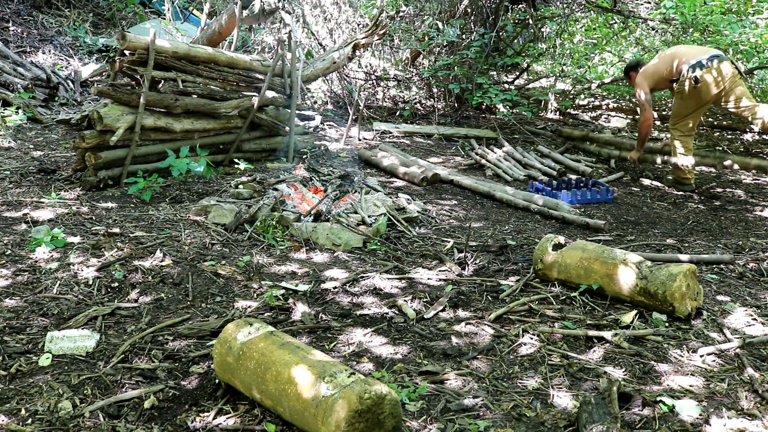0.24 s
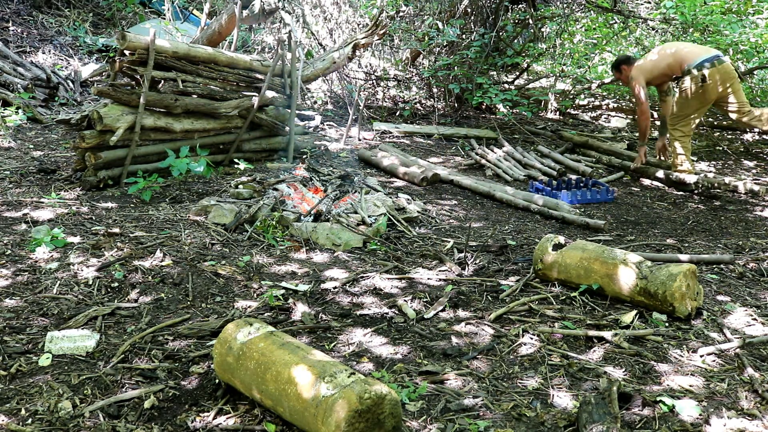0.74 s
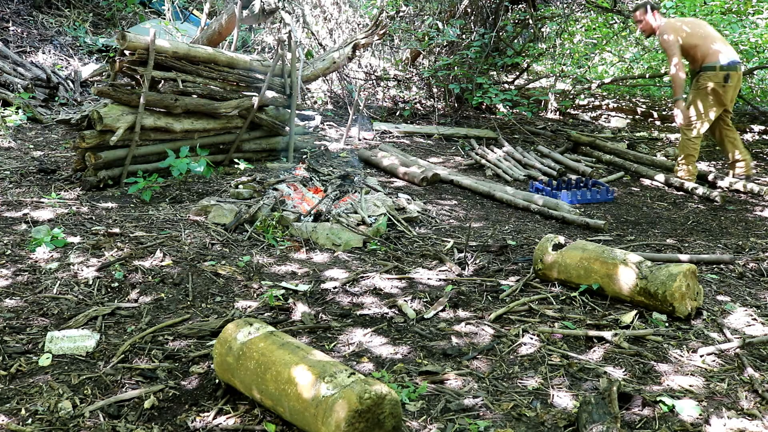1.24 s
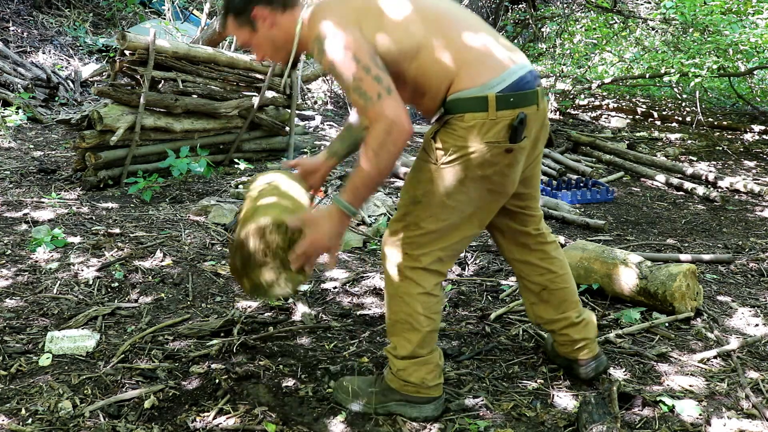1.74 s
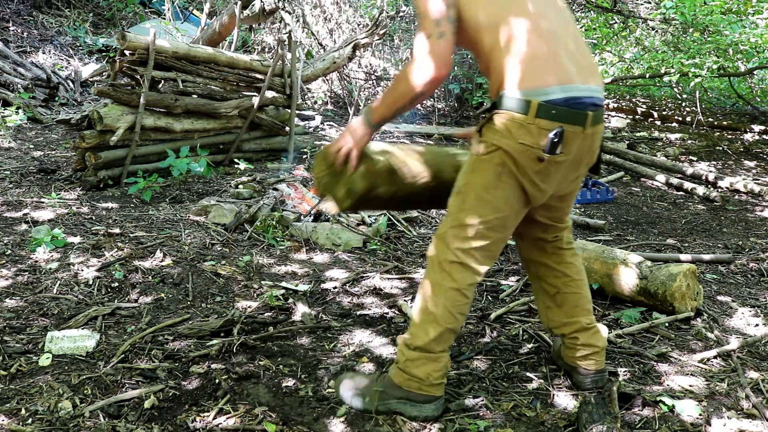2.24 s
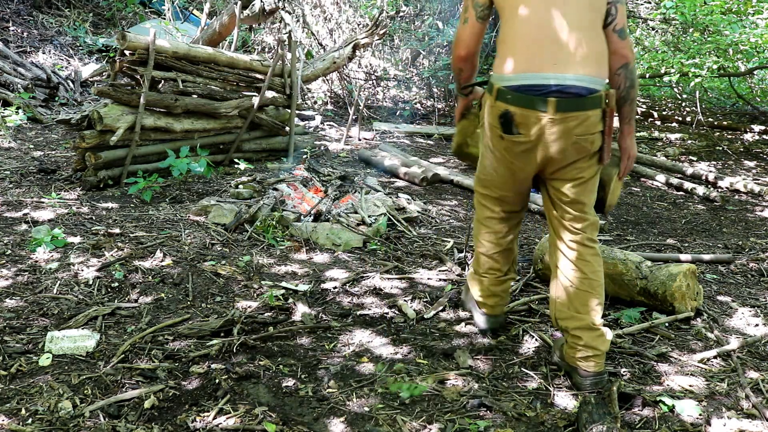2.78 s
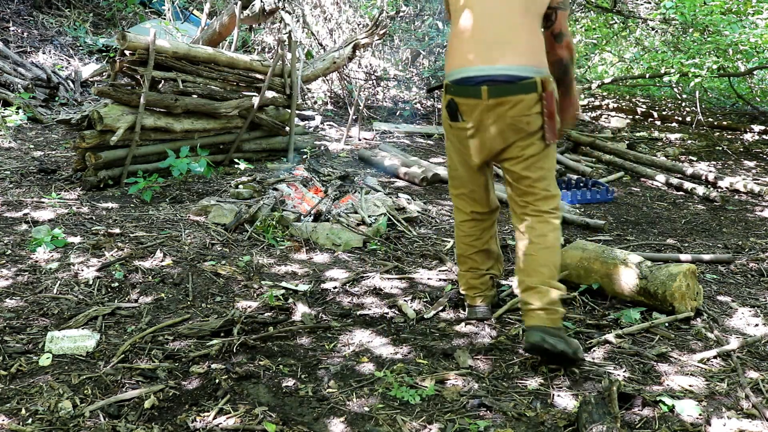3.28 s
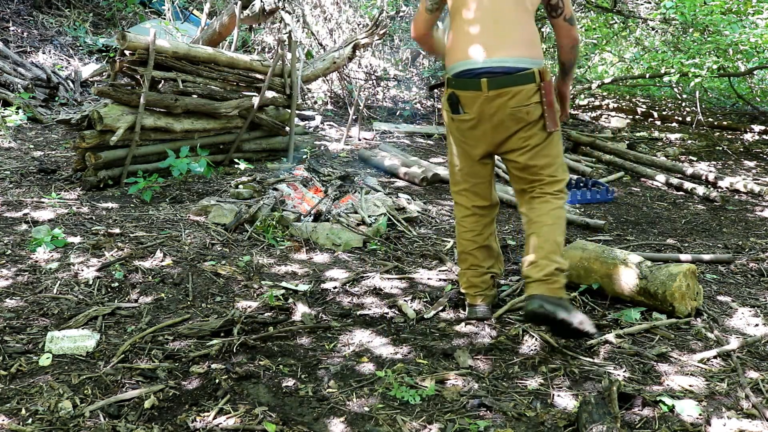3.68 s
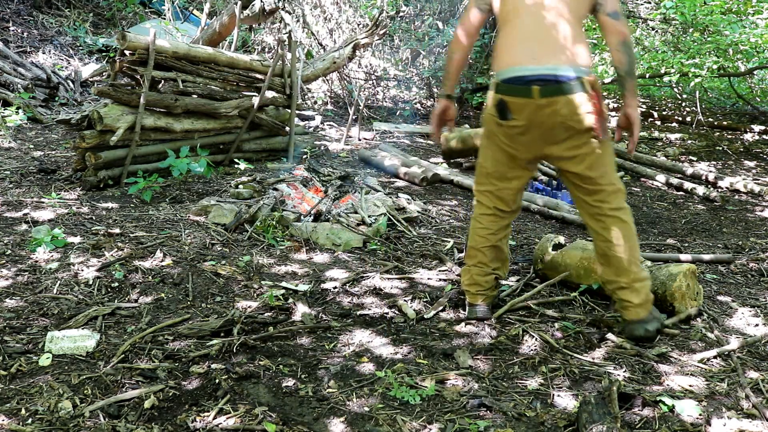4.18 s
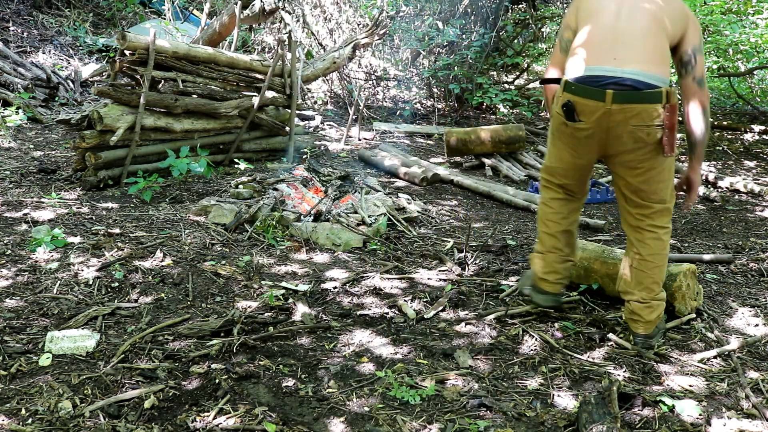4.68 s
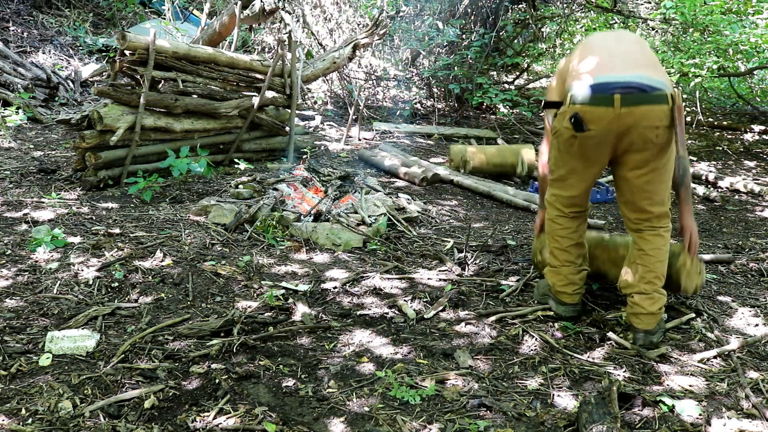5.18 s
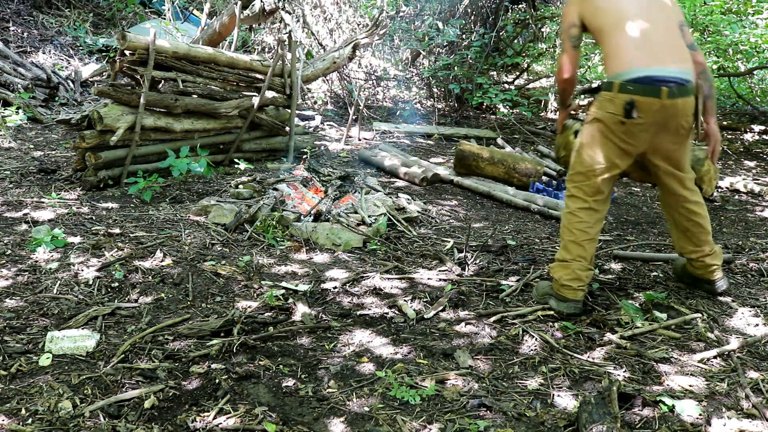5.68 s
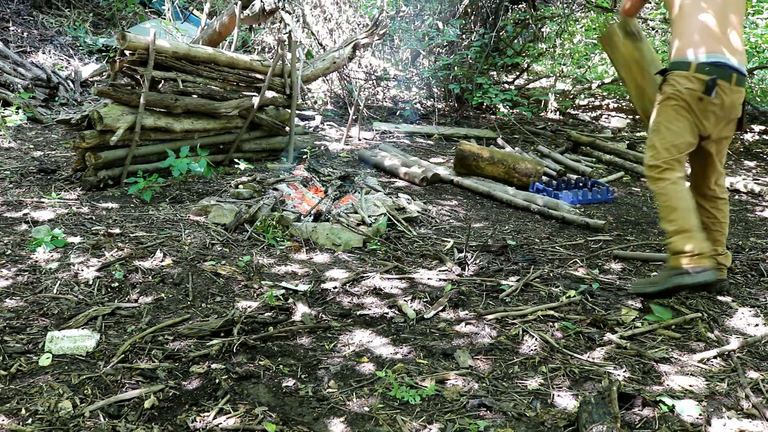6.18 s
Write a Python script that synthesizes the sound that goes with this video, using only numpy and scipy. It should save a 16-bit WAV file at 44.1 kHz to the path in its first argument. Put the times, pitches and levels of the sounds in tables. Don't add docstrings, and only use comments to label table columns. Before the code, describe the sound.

Outdoors in woodland, insects buzz shrilly and constantly over a faint low rumble and far engine hum. A light leafy step, then a short log hits wood with a loud, dull, very brief knock. Leaves scuff and twigs snap until a thrown log lands more resonantly, with bark cracking, followed by small thuds and footfalls. Close, slightly overloaded camera microphone.

```python
import sys
import numpy as np
from scipy import signal
from scipy.fft import rfft, irfft, next_fast_len
from scipy.io import wavfile

SR = 44100
rng = np.random.default_rng(int(sys.argv[2]) if len(sys.argv) > 2 else 0)


def makeup_ratio(level_db):
    decades = np.asarray(level_db, float) / 20
    return 10 ** decades


def bounce(signal):
    frames = np.transpose(np.atleast_2d(signal))
    limited = np.clip(frames, -1, 1)
    pcm = np.round(limited * 32767).astype(np.int16)
    wavfile.write(sys.argv[1], SR, pcm)


N = 283512


# start in seconds, peak in dB, hardness of the contact in Hz.
SHORT_LOG_HITS = [
    (1.3475, -17, 6000),
    (1.3508, 8.5, 700),
    (1.3552, 6, 2500),
    (1.3578, -1, 2500),
    (1.3600, 5, 2030),
    (1.3635, -16, 1500),
    (1.369, -20, 1000),
    (1.376, -32, 800),
]
# pitch in Hz, level in dB, time to fade by 60 dB in seconds.
SHORT_LOG_MODES = [(130, -31, 0.036), (280, -44, 0.013), (508, 5, 0.01), (730, -7.5, 0.02),
                   (900, -27, 0.012), (1170, 4.5, 0.003), (1500, -6, 0.035), (2020, -5, 0.0086),
                   (2500, -29, .012), (3180, -11, .01)]


def short_log():
    return -log_blow(SHORT_LOG_HITS, SHORT_LOG_MODES, gain_db=-6.5, crack_db=-4.5)


# start in seconds, peak in dB, hardness of the contact in Hz.
THROWN_LOG_HITS = [
    (4.0192, -22, 7000),
    (4.0225, -11, 1000),
    (4.028, -12, 450),
    (4.0318, -7, 2200),
    (4.0335, 6, 650),
    (4.0378, -5, 2400),
    (4.0405, -5, 1300),
    (4.0462, -9, 2000),
    (4.050, -15, 1500),
]
# pitch in Hz, level in dB, time to fade by 60 dB in seconds.
THROWN_LOG_MODES = [(190, -18, .035), (254, -27.5, .45), (350, -1.5, .011), (455, -21, .08),
                    (515, -14.5, .16), (592, -19, .12), (272, -33, .3), (720, -10, .025), (950, -7, .032),
                    (1200, -7, .03), (1500, -7, .025), (1780, -9, .022), (2300, -10, .02),
                    (3000, -20, .015)]


def thrown_log():
    return -log_blow(THROWN_LOG_HITS, THROWN_LOG_MODES, gain_db=1.5, crack_db=-13)


def log_blow(hits, modes, gain_db, crack_db):
    push = np.zeros(N)
    for s, peak_db, hard_hz in hits:
        at = round(s * SR)
        contact = np.hanning(int(SR / hard_hz) + 3)
        push[at:at + len(contact)] += makeup_ratio(peak_db + gain_db) * contact / contact.sum()
    wood = np.zeros(N)
    for k, (hz, db, t60) in enumerate(modes):
        wood += (-1) ** k * makeup_ratio(db) * ring(push, hz, t60)
    burst = signal.lfilter([1], [1, -.993], push + 1e-18) * rng.standard_normal((2, N))
    crackle = band(0.23 * burst[0] + 0.35 * burst, 570, 4450)
    return wood + makeup_ratio(crack_db + np.array([[-2.5], [2.5]])) * crackle


# start in seconds, peak in dB, pitch of the body in Hz, left minus right in dB.
TAPS = [(0.359, -23.5, 616, -3.5), (1.412, -24, 1770, -3), (1.417, -13.5, 950, 1), (1.421, -12, 1030, -6),
        (1.426, -18, 900, 0), (1.786, -26, 2120, -2), (2.531, -35, 260, 2), (2.915, -32.5, 202, -2),
        (3.104, -41, 525, -3), (3.294, -31.5, 676, 0), (3.465, -46, 940, 0), (4.133, -22, 256, 3),
        (4.205, -21, 277, 0), (4.306, -14.5, 2200, -12), (1.433, -21, 1500, -4), (2.088, -32.5, 1300, -4),
        (4.804, -35, 302, 0), (4.857, -30, 280, -4), (5.144, -28.5, 378, 0), (5.226, -27, 420, -1),
        (5.274, -30, 202, -1), (5.524, -40, 205, -1), (5.976, -40, 465, -3), (6.26, -38.5, 296, -2)]
# start in seconds, peak in dB, pitch of the body in Hz, left minus right in dB.
THUDS = [(0.401, -28.5, 202, -2), (0.411, -30, 500, -6), (0.396, -27, 100, -3), (0.729, -40, 687, -5),
         (3.44, -34, 1800, -11), (4.361, -19.5, 276, -1), (5.047, -23.5, 252, -2), (5.106, -22.5, 890, 1),
         (5.244, -29.5, 640, 2), (5.372, -27, 231, -2), (5.779, -26.5, 262, -3), (6.209, -33, 1300, -12)]


def knocks():
    out, t = np.zeros((2, N + 6000)), np.arange(6000) / SR
    for rows, t60 in ((TAPS, 0.043), (THUDS, 0.062)):
        for s, peak_db, hz, pan_db in rows:
            burst = rng.standard_normal((2, len(t))) * makeup_ratio(-60 * t / t60)
            blow = band(burst[0] + 0.25 * burst, 0.55 * hz, 1.44 * hz)
            add(out, blow, s - 1 / hz, peak_db, pan_db)
    return out[:, :N]


# start in seconds, peak in dB, low part in dB, left minus right in dB.
TWIGS = [(0.391, -23.5, -25, -16), (1.4344, -22.5, -3, -2), (1.6694, -31, -21, 0), (2.089, -32, -5, -4),
         (2.396, -18.5, -0.5, 0), (2.4334, -19.5, -4, -3), (2.9188, -33.5, 0, 1), (3.4135, -20, 0, -4),
         (4.1824, -17.5, -1, -7), (4.2343, -21.5, 2, -6), (4.2454, -22, -21, -7), (4.2587, -23, -9, -11),
         (4.2924, -21, -24, -3.5), (4.3062, -10, -11, 2.5), (4.3205, -17, -13, -3), (5.097, -32, -2, -10),
         (5.109, -31, 2, -8), (5.1404, -27.5, -16, -14), (5.232, -27.5, -11, -5), (5.3698, -32, 0, -10),
         (5.643, -36.5, -18, -16), (5.776, -40.5, 9, -3.5)]
# start in seconds, peak in dB, low part in dB, left minus right in dB.
SPLINTERS = [
    (2.2728, -24, -12, -6),
    (4.1845, -12, -13, 0),
    (4.2067, -23, -25, -23),
    (4.335, -20, -21, -14),
    (4.3547, -19.5, -15, -11),
    (5.0484, -26, -5, -10),
]


def snaps():
    out, t = np.zeros((2, N + 2000)), np.arange(2000) / SR
    for rows, air_db in ((TWIGS, -11.5), (SPLINTERS, -5)):
        for s, peak_db, low_db, pan_db in rows:
            burst = rng.standard_normal((2, len(t))) * makeup_ratio(-60 * t / .01) + 3.0 * (t == 0)
            crack = rms_one(band(.5 * burst[0] + burst, 1160, 4220))
            crack = crack + makeup_ratio(low_db) * rms_one(band(burst[0], 290, 1440))
            crack = crack + makeup_ratio(air_db) * rms_one(band(burst[0], 3500, 7900))
            add(out, crack, s, peak_db + 7.0, pan_db)
    return out[:, :N]


# start of full level in seconds, level in dB, time held in seconds, hollow share from 0 to 1.
STROKES = [(0.359, -42.5, 0.0068, 0.2), (0.395, -38.5, .035, 0.03), (1.372, -38, 0.022, 0),
           (1.42, -38, 0.014, 0.4), (1.47, -57, 0.033, 0.3), (1.71, -34.5, 0.056, 0.64),
           (1.825, -40, 0.0054, 0.2), (1.88, -42, 0.073, 0.45), (2.04, -51.5, 0.21, 0.14),
           (2.4, -51, .22, 0.5), (3.3, -39.5, .004, 0.3), (3.33, -50, 0.055, 0.3), (3.43, -54, 0.062, 0.3),
           (4.023, -31.5, .012, .05), (4.06, -30, 0.055, 0.73), (4.15, -32, 0.093, .1),
           (4.27, -46, 0.028, 0), (4.315, -35.5, 0.015, 0.09), (4.35, -43.5, 0.051, 0.64),
           (5.056, -36, 0.0067, 0.44), (5.106, -40, 0.024, 0.14), (5.233, -41, .006, 0.44),
           (5.334, -47, .003, .6), (5.375, -39, 0.013, 0.34), (5.43, -47, .27, 0.27),
           (6.205, -39, 0.013, 0.04), (6.263, -43, .004, 0.5)]
# pitch in Hz, level in dB per Hz.
LITTER = [(250, -49), (500, -23), (1000, 3), (2000, 0), (3500, 0), (7000, -55)]
# pitch in Hz, width in Hz, level in dB.
HOLLOW = [(540, 130, -6), (830, 190, 0), (1300, 350, -9)]


def scuff():
    cracking = rng.random((2, N)) < 2500 / SR
    height = makeup_ratio(3.8 * np.minimum(rng.exponential(1, (2, N)), 4))
    grains = height * rng.choice([-1, 1], (2, N)) * cracking
    hz = np.maximum(np.fft.rfftfreq(N, 1 / SR), 1)
    crunch = rms_one(irfft(rfft(0.21 * grains[0] + .5 * grains) * makeup_ratio(at_hz(LITTER, hz)), N))
    hollow = sum(makeup_ratio(db) * rms_one(ring(grains[0], f, 2.2 / width)) for f, width, db in HOLLOW)
    hollow = rms_one(band(hollow, 540, 1500))
    out, t = 0, np.arange(N) / SR
    for s, db, held_s, share in STROKES:
        rise_db = 750 * np.maximum(s - t, 0)
        fall_db = 520 * np.maximum(t - s - held_s, 0)
        rub = np.sqrt(1 - share) * crunch + np.sqrt(share) * hollow
        out = out + makeup_ratio(db - rise_db - fall_db) * rub
    return out * makeup_ratio(1.4 * drift(35))


# start in seconds, end in seconds, pitch in Hz, level in dB.
CREAK = (3.33, 3.385, 510, -47)


def creak():
    start, end, hz, db = CREAK
    tone = np.sin(2 * np.pi * np.cumsum(hz + 12 * drift(40)) / SR)
    return makeup_ratio(db + 2.0 * drift(40)) * gate(start, end, .008) * tone


# pitch in Hz, level in dB per Hz.
CHORUS = [(1530, -49), (2600, -29.5), (3000, -25.5), (3810, -8.5), (4230, -8), (4600, -8), (6210, -4.5),
          (6950, -5.5), (7600, 2.5), (8770, -14.5), (9030, -17), (9880, -18.5), (12100, -13),
          (13700, -13.5), (15600, -22.5)]
# pitch in Hz, width in Hz, level in dB.
TYMBALS = [(6170, 980, 3), (7520, 310, -2), (7990, 290, 3), (8505, 214, 9.5)]
# time in seconds, level in dB.
SWELL = [(0.0, -26), (1.45, -25), (3.85, -24.5), (4.05, -25), (6.43, -25)]
BUZZ = [(68.6, .25), (83.2, .22), (54.2, .2), (154, .18)]


def chorus():
    t = np.arange(N) / SR
    pulse = sum(depth * np.cos(2 * np.pi * (rate * t + .1 * drift(1.5))) for rate, depth in BUZZ)
    hiss = noise_like(CHORUS, TYMBALS)
    low = signal.sosfiltfilt(signal.butter(4, 7000, fs=SR, output="sos"), hiss)
    below_top = signal.sosfiltfilt(signal.butter(4, 11000, fs=SR, output="sos"), hiss)
    throb = low * makeup_ratio(0.44 * pulse + 0.26 * drift(42))
    throb = throb + (below_top - low) * makeup_ratio(0.81 * pulse + .5 * drift(30))
    throb = throb + (hiss - below_top) * makeup_ratio(2.4 * pulse + 1.0 * drift(35))
    return makeup_ratio(in_time(SWELL)[0] + 0.62 * drift(16.0)) * throb


# time in seconds, pitch in Hz, level in dB.
HUM = [
    [(0.0, 156.5, -51.5), (0.7, 159, -48), (1.11, 165, -41), (1.32, 163.7, -50)],
    [(1.5, 89.5, -48.5), (4.2, 94.3, -44.5), (5.6, 96.5, -50.5), (6.43, 96, -50)],
    [(0, 299, -62), (1.3, 298, -58), (2.8, 299, -84.5), (6.43, 297, -57.5)],
]


def engine():
    out = np.zeros(N)
    for rows in HUM:
        hz, db = in_time(rows)
        level = np.sqrt(2) * gate(rows[0][0], rows[-1][0], 0.021) * makeup_ratio(db + 0.8 * drift(4.5))
        out += level * np.sin(2 * np.pi * np.cumsum(hz + 0.71 * drift(3.4)) / SR)
    return out


# pitch in Hz, level in dB per Hz.
WOOD = [(12, -50), (20, -8.5), (90, 1.5), (105, -1.5), (127, -2.5), (160, -3), (194, -5.5), (303, -13),
        (367, -16.5), (444, -12), (561, -14.5), (1040, -21), (3200, -22), (4160, -57), (7040, -120)]


def distant_air():
    return makeup_ratio(-44 + .5 * drift(3.1)) * noise_like(WOOD)


def trees(x):
    t = np.arange(9000) / SR
    tail = rng.standard_normal((2, 9000)) * makeup_ratio(-60 * t / 0.22) * (t > .006)
    tail = band(1.56 * tail[0] + .5 * tail, 690, 6000)
    return makeup_ratio(-42) * signal.fftconvolve(x, tail, axes=1)[:, :N]


# pitch in Hz, likeness, where 1 is the same.
LIKENESS = [(60, .99), (200, .96), (350, .88), (800, .28), (1900, .2), (3000, -.05), (4000, 0), (4500, .55),
            (5000, .96), (6500, .99), (7400, .85), (8300, .99), (12300, .97), (14500, .8)]
# pitch in Hz, left minus right in dB.
LEAN = [(60, 0.5), (400, 2), (900, -1), (2500, -4), (4000, -1.5), (5200, 0), (7400, -0.6), (9000, -3.5),
        (12000, -1.5), (14500, -0.5)]


def noise_like(spectrum, peaks=()):
    size = next_fast_len(N)
    hz = np.maximum(np.fft.rfftfreq(size, 1 / SR), 1)
    level_db = at_hz(spectrum, hz) + sum(db / (1 + (2 * (hz - f) / w) ** 2) for f, w, db in peaks)
    mid, side = rfft(rng.standard_normal((2, size)))
    alike = np.clip(at_hz(LIKENESS, hz), 0, 1)
    sides = np.array([[1], [-1]])
    pair = np.sqrt(1 + alike) * mid + np.sqrt(1 - alike) * side * sides
    return rms_one(irfft(pair * makeup_ratio(level_db + sides * at_hz(LEAN, hz) / 2), size)[:, :N])


def ring(clicks, hz, t60):
    r, w = makeup_ratio(-60 / (t60 * SR)), 2 * np.pi * hz / SR
    return signal.lfilter([0, np.sin(w)], [1, -2 * r * np.cos(w), r * r], clicks + 1e-18)


def drift(rate):
    r = np.exp(-80 * np.pi * rate / SR)
    slow = signal.lfilter([1], [1, -2 * r, r * r], rng.standard_normal(N // 40 + 4002))[4000:]
    return np.interp(np.arange(N) / 40, np.arange(len(slow)), rms_one(slow - slow.mean()))


def band(x, low_hz, high_hz):
    return signal.sosfilt(signal.butter(2, [low_hz, high_hz], "band", fs=SR, output="sos"), x)


def add(out, blow, s, peak_db, pan_db):
    at = round((s + .002) * SR)
    level = makeup_ratio(peak_db + np.array([[pan_db / 2], [-pan_db / 2]]))
    out[:, at:at + blow.shape[-1]] += blow / np.abs(blow).max() * level


def gate(start, end, fade_s):
    t = np.arange(N) / SR
    return np.clip(np.minimum(t - start, end - t) / fade_s + 1, 0, 1)


def in_time(rows):
    s, *columns = np.transpose(rows)
    return [np.interp(np.arange(N) / SR, s, c) for c in columns]


def at_hz(points, hz):
    points = np.array(points)
    return np.interp(np.log(hz), np.log(points[:, 0]), points[:, 1])


def rms_one(x):
    return x / np.sqrt(np.mean(x ** 2) + 1e-20)


def scene():
    near = short_log() + thrown_log() + snaps() + knocks() + creak()
    near = near + scuff() * makeup_ratio(np.array([[-.8], [.8]]))
    near = signal.sosfilt(signal.butter(4, 85, "high", fs=SR, output="sos"), near)
    return near + trees(near) + chorus() + engine() + distant_air()


def top_cut(x):
    return signal.sosfilt(signal.butter(12, 15770, fs=SR, output="sos"), x)


def record(dry):
    above_db, share, recover_db_s, attack_s = -6, 0.82, 57, 0.0054
    level_db = 20 * np.log10(np.abs(dry).max(axis=0) + 1e-6)
    creep = recover_db_s * np.arange(N) / SR
    duck_db = np.maximum.accumulate(share * np.maximum(level_db - above_db, 0) + creep) - creep
    r = np.exp(-1 / (attack_s * SR))
    ducked = dry * makeup_ratio(-signal.lfilter([1 - r], [1, -r], duck_db))
    no_rumble = signal.sosfilt(signal.butter(1, 30, "high", fs=SR, output="sos"), ducked)
    return top_cut(np.clip(no_rumble, -1, 1))


dry = scene()
out = record(dry)
bounce(out)
```